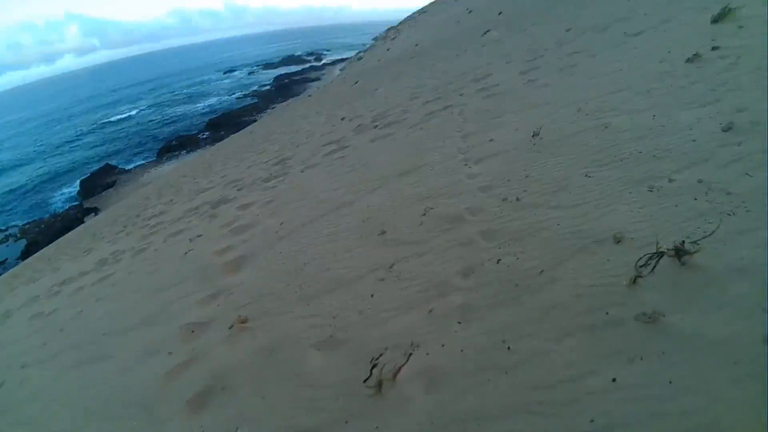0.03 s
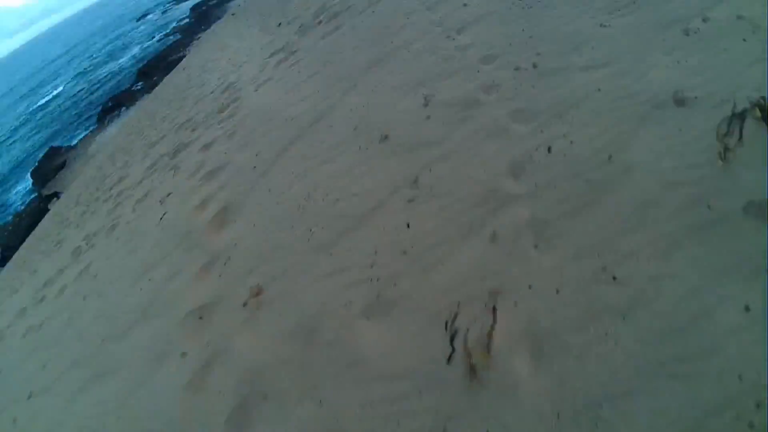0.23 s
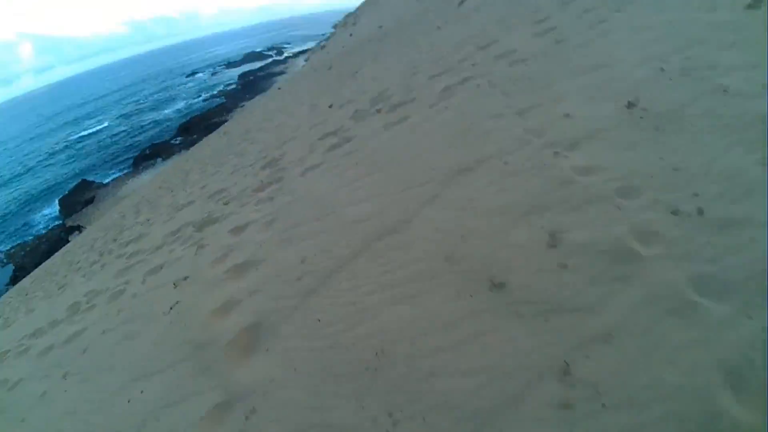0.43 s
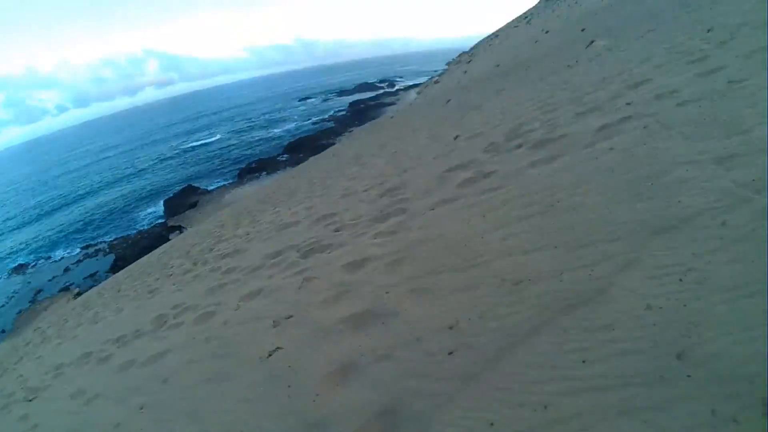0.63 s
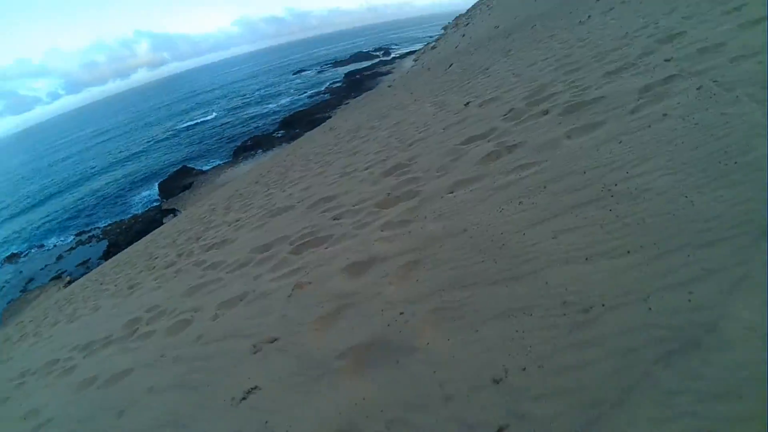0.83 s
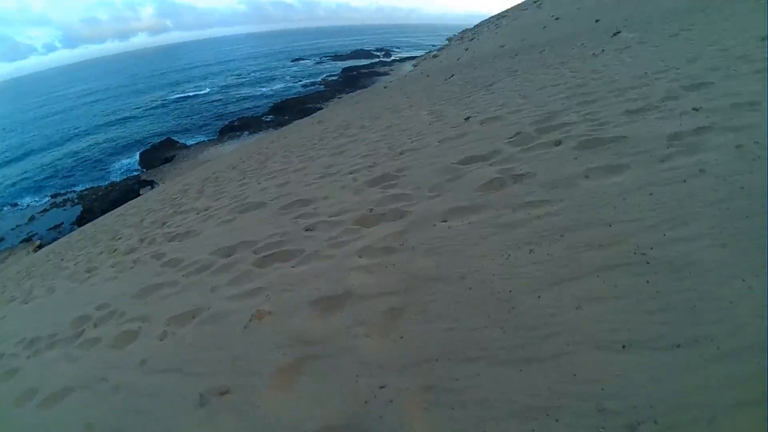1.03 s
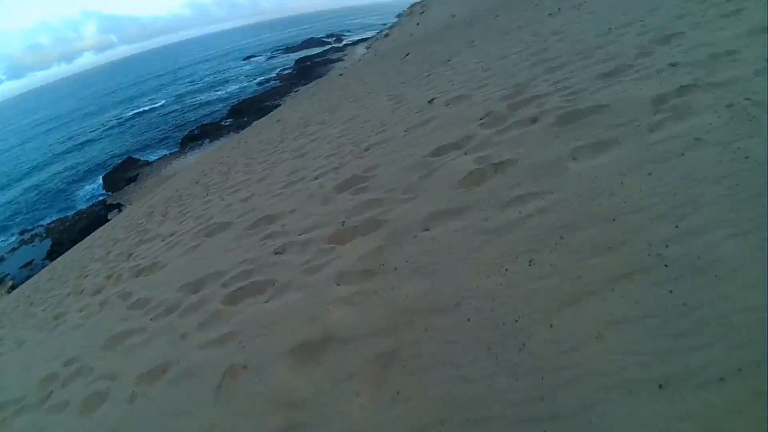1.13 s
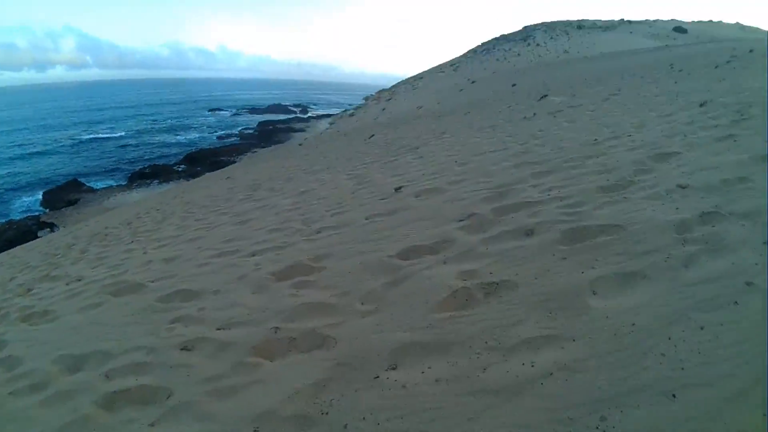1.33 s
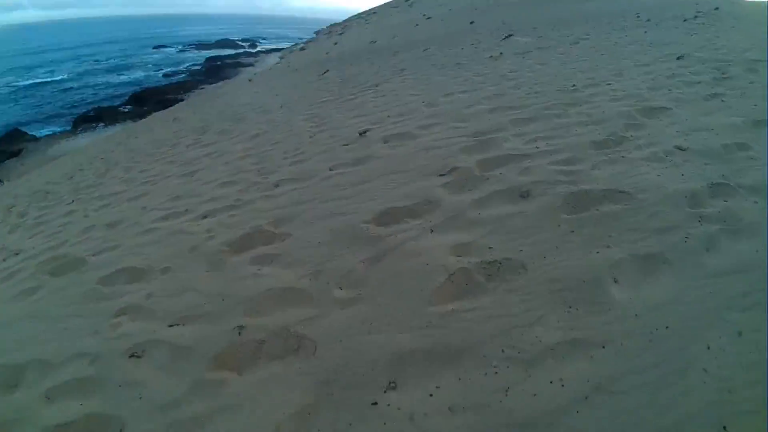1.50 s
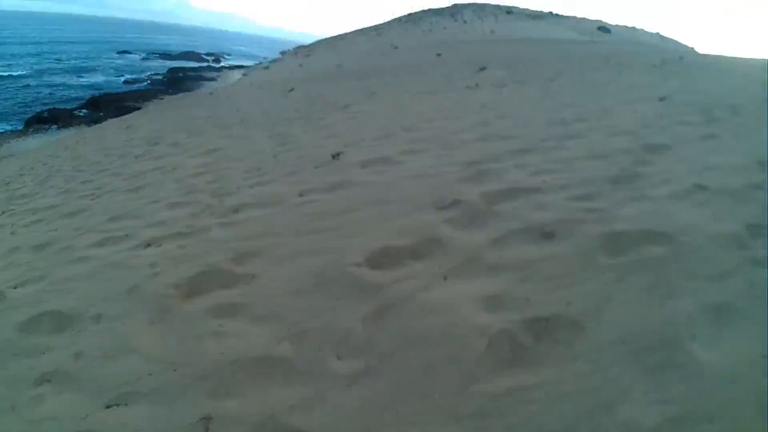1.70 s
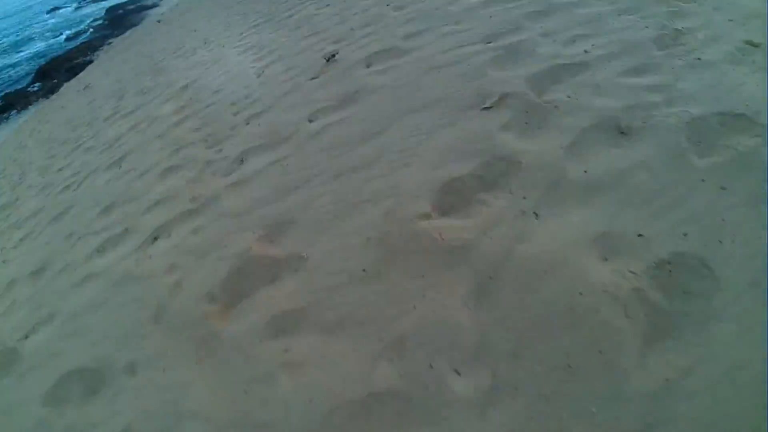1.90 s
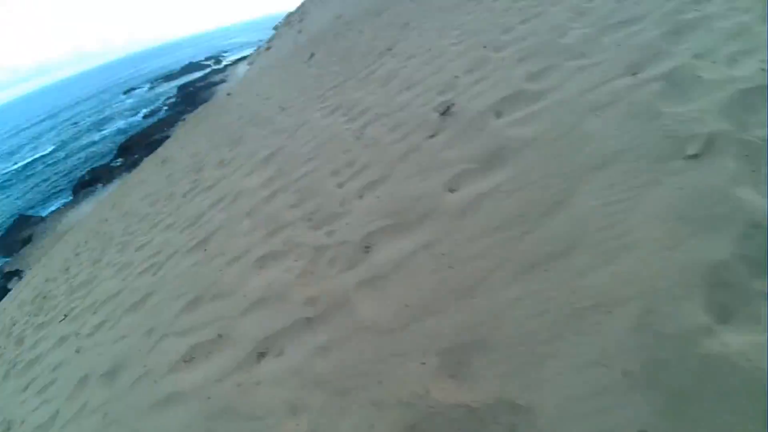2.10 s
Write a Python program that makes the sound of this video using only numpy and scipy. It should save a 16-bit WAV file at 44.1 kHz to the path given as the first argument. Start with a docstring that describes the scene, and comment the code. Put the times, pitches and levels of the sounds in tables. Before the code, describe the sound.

Muffled wind and surf hiss steadily on a coastal dune, heard from a moving microphone inside a closed plastic case. Sand scuffs, the case knocks sharply once and rattles briefly, then soft bumps and more sliding sand follow.

```python
"""Dune wind and surf inside a camera housing

Wind and surf reach a moving camera through its closed plastic housing, which muffles them and
rings near 1.2 kHz. Sand scuffs past, the mount knocks once sharply and chatters, softer bumps
follow. Buffeting shakes the case with a faint rumble; the electronics hiss very faintly."""
import sys
import numpy as np
from scipy import signal
from scipy.fft import rfft, irfft
from scipy.io import wavfile

SR = 44100
rng = np.random.default_rng(int(sys.argv[2]) if len(sys.argv) > 2 else 0)


def file_out(sig):
    """Save sig as 16-bit WAV at sys.argv[1]."""
    # one column per channel
    cols = np.atleast_2d(sig).T
    # limit, then scale
    lim = np.clip(cols, -1, 1)
    pcm = np.round(lim * 32767).astype(np.int16)
    wavfile.write(sys.argv[1], SR, pcm)


N = 94815
T = np.arange(N) / SR
HZ = np.fft.rfftfreq(4096, 1 / SR)  # grid for impulse responses

# transmission through the housing: f/Hz, gain/dB
HOUSING = [(60, -48), (250, -33), (420, -32), (700, -28), (900, -21), (1030, -17.5), (1140, -7.5),
           (1230, 1), (1340, -6.5), (1500, -15), (1750, -21), (2080, -17.5), (2430, -22.5), (2680, -14.5),
           (3000, -20.5), (3250, -26), (3700, -28), (4400, -41.5), (4900, -47), (5400, -56.5), (5950, -71),
           (7500, -76.5)]


def amp(db):
    """Decibels to gain."""
    return 10 ** (np.asarray(db) / 20)


def unit(x):
    """Scale to rms 1."""
    return x / np.sqrt(np.mean(x ** 2) + 1e-20)


def colour(points, hz=HZ):
    """Gain of an (f/Hz, gain/dB) table, interpolated in log frequency."""
    f, db = np.transpose(points)
    return amp(np.interp(np.log(hz + 1), np.log(f + 1), db))


def level(points):
    """Gain per sample of a (t/s, level/dB) curve."""
    return amp(np.interp(T, *np.transpose(points)))


def bell(centre_s, sigma_s):
    """Gaussian envelope, peak 1."""
    return np.exp(-.5 * ((T - centre_s) / sigma_s) ** 2)


def bursts(rows):
    """Sum of bells, one per (t/s, sigma/s, level/dB)."""
    return sum(amp(db) * bell(s, sigma_s) for s, sigma_s, db in rows)


def ring(gain):
    """Minimum-phase impulse response for a gain over HZ."""
    log_gain = np.log(np.maximum(np.r_[gain, gain[-2:0:-1]] / gain.max(), 1e-5))
    return np.fft.ifft(np.exp(np.conj(signal.hilbert(log_gain)))).real


def shaped(x, *tables):
    """Filter x by spectrum tables; rms 1."""
    hz = np.fft.rfftfreq(N, 1 / SR)
    gain = np.prod([colour(table, hz) for table in tables], 0)
    return unit(irfft(rfft(x) * gain, N))


def drift(rate_hz):
    """Slow random wander, rms 1."""
    hz = np.fft.rfftfreq(N, 1 / SR)
    lowpass = (hz > 0) / (1 + (hz / rate_hz) ** 4)
    return unit(irfft(rfft(rng.standard_normal(N)) * lowpass, N))


def taps(events, gain):
    """Impulse response of a gain over HZ, placed at each (t/s, peak/dB)."""
    out, sound = np.zeros(N), ring(gain)
    for s, db in events:
        part = out[round(s * SR):][:len(sound)]
        part += amp(db) * sound[:len(part)] / abs(sound).max()
    return out


def wind_and_surf(trim_db=-0.52, flutter_db=0.32):
    """Steady wind and surf excite the hollow ring of the housing."""
    envelope = [(0, -50), (.25, -50), (.45, -49.5), (.7, -51), (.95, -50.5), (1.15, -50), (1.4, -51),
                (1.75, -51), (2.15, -51.5)]  # both together: t/s, level/dB
    spectrum = [(200, -1), (1200, -0.5), (1800, -0.5), (2800, -4), (5000, 3)]  # outside the housing: f/Hz, gain/dB
    air = shaped(rng.standard_normal(N), spectrum, HOUSING)
    return air * level(envelope) * amp(trim_db + flutter_db * drift(rate_hz=8.3))


def sand(grains_per_s=5000, spread_db=6.5):
    """Dense grains of uneven size: a continuous slide with brief scuffs."""
    slide = [(0, -69), (.2, -62), (.3, -58.5), (.42, -54), (.55, -69), (.76, -57.5), (.98, -70.5),
             (1.25, -65.5), (1.45, -68), (1.62, -66), (1.82, -77.5), (2.04, -58.5), (2.15, -61)]  # sliding sand: t/s, level/dB
    scuffs = [(0.032, 0.0032, -48), (.046, 0.0059, -46.5), (1.526, .012, -57.5), (1.631, 0.018, -55.5),
              (1.729, 0.011, -52), (1.773, 0.011, -57.5), (1.896, 0.0061, -65), (1.926, 0.013, -61),
              (2.025, 0.012, -62)]  # t/s, sigma/s, level/dB
    spectrum = [(200, -11.5), (800, -23), (1230, -20.5), (1700, 8.5), (2800, 6), (5000, 1)]  # outside the housing: f/Hz, gain/dB
    size = amp(spread_db * np.minimum(rng.exponential(1, N), 4))
    grains = size * rng.choice([-1, 1], N) * (rng.random(N) < grains_per_s / SR)
    return shaped(grains, spectrum, HOUSING) * np.hypot(level(slide), bursts(scuffs))


def buffeting(trim_db=1):
    """Wind and movement shake the case: a lumpy rumble."""
    envelope = [(0, -55), (.12, -58), (.2, -64), (.29, -63.5), (.42, -58), (.53, -56.5), (.6, -64),
                (.75, -59.5), (.82, -68), (.97, -66), (1.08, -76), (1.17, -62), (1.47, -70), (1.54, -56.5),
                (1.67, -61.5), (1.73, -68.5), (1.92, -68), (2.03, -57), (2.15, -64.5)]  # shaking: t/s, level/dB
    spectrum = [(5, 1), (18, 0), (33, -1), (48, -6), (70, -12.5), (120, -19), (200, -24.5), (350, -38.5),
                (800, -46.5), (2000, -93.5)]  # f/Hz, gain/dB
    return shaped(rng.standard_normal(N), spectrum) * level(envelope) * amp(trim_db)


def electronics(hiss_db=-83, whine_db=-86, whine_hz=15080, interference_hz=10806, spell_s=0.033):
    """Camera self-noise: hiss, a steady whine, short spells of electrical interference."""
    spectrum = [(4000, -19), (5900, -26.5), (6600, -8.5), (7200, -11.5), (8000, -20.5), (8900, -8.5),
                (9800, -2), (12500, -1), (15000, -4.5)]  # hiss: f/Hz, gain/dB
    lifts = [(.275, 4.7), (.5, 4.6), (.872, 4), (1.175, 3.5), (1.465, 3.8)]  # brief rises of the hiss: t/s, lift/dB
    spells = [(1.5, -78.5), (1.82, -79), (2.058, -79)]  # start t/s, level/dB
    lift_db = sum(db * bell(s, sigma_s=.012) for s, db in lifts)
    hiss = amp(hiss_db + lift_db) * shaped(rng.standard_normal(N), spectrum)
    whine = amp(whine_db) * np.sin(2 * np.pi * whine_hz * T)
    gate = sum(amp(db) * np.clip(np.minimum(T - s, s + spell_s - T) / .002, 0, 1) for s, db in spells)
    return hiss + whine + gate * np.sin(2 * np.pi * interference_hz * T)


def grain_ticks():
    """Single coarse grains strike the case."""
    hits = [(.0366, -35), (.0501, -53), (1.631, -43), (1.8805, -39)]  # t/s, peak/dB
    spectrum = [(200, -7.5), (800, 1.5), (1230, -15.5), (1700, 7.5), (2700, -8), (5000, 0)]  # outside the housing: f/Hz, gain/dB
    return taps(hits, colour(spectrum) * colour(HOUSING))


def mount_knocks(skirt=1.29):
    """Knocks on the mount ring the housing; soft ones excite mainly its low modes."""
    modes = [(260, 110, -27), (410, 64, -6.5), (600, 65, -27), (700, 110, -2), (890, 63, -5.5),
             (1231, 102, 4), (1680, 450, -15.5), (2075, 120, -13), (2670, 87, -25.5), (3450, 500, -20),
             (4650, 600, -39)]  # housing resonances: f/Hz, width/Hz, level/dB
    knocks = [(0.2018, -10.5, 4960), (0.2308, -35.5, 820), (0.5215, -35.5, 560), (1.526, -50.5, 690)]  # t/s, peak/dB, cutoff/Hz
    power = sum(amp(db) ** 2 / (1 + (2 * (HZ - hz) / (width_hz * skirt)) ** 2) ** skirt
                for hz, width_hz, db in modes)
    wall = colour([(40, -25), (200, -9), (600, -10), (2750, 17.5), (3050, 1), (4000, -6.5),
                   (4800, -4.5), (5900, -33), (8000, -48.5)])
    body = np.sqrt(power) * wall
    return sum(taps([(s, db)], body / (1 + (HZ / cutoff_hz) ** 2)) for s, db, cutoff_hz in knocks)


def housing_swells(ring_hz=1230, sigma_s=0.0021):
    """Brief, clickless surges of the housing's main resonance."""
    swells = [(.219, -37), (0.2444, -45), (.819, -44), (1.074, -42), (1.174, -37.5), (1.53, -44),
              (2.066, -40.5)]  # t/s, peak/dB
    return sum(amp(db) * bell(s, sigma_s) * np.sin(2 * np.pi * (ring_hz * T + rng.random()))
               for s, db in swells)


def mount_chatter():
    """Plastic rasps on plastic as the mount settles after the sharp knock."""
    slips = [(.2275, 0.0017, -42), (.231, 0.0011, -46.5), (.2375, 0.0021, -39)]  # t/s, sigma/s, level/dB
    spectrum = [(300, -36.5), (1500, -26), (1800, -17), (2060, 0), (2300, -5), (2600, -26), (3800, -28),
                (4900, -34.5), (5900, -60), (9000, -79)]  # f/Hz, gain/dB
    return shaped(rng.standard_normal(N), spectrum) * bursts(slips)


def thumps():
    """Whatever carries the camera bumps dully on the sand."""
    bumps = [(.708, -56.5), (1.195, -58), (1.243, -59), (1.408, -62), (1.523, -59), (1.66, -57),
             (1.95, -54.5), (2.068, -59.5)]  # t/s, peak/dB
    spectrum = [(30, -4.5), (90, -1.5), (160, -1.5), (220, -5.5), (330, -17), (800, -50), (2000, -83.5)]  # f/Hz, gain/dB
    return taps(bumps, colour(spectrum))


def scene():
    """Mono sum at the microphone in the housing."""
    bed = wind_and_surf() + sand() + buffeting()
    return (bed + grain_ticks() + mount_knocks() + housing_swells() + mount_chatter() + thumps())[None]


def record(dry, cutoff_hz=15250):
    """Add self-noise, then band-limit."""
    lowpass = signal.firwin(511, cutoff_hz, window=("kaiser", 9), fs=SR)
    return signal.oaconvolve(dry + electronics(), lowpass[None], "same")


dry = scene()
out = record(dry)
file_out(out)
```